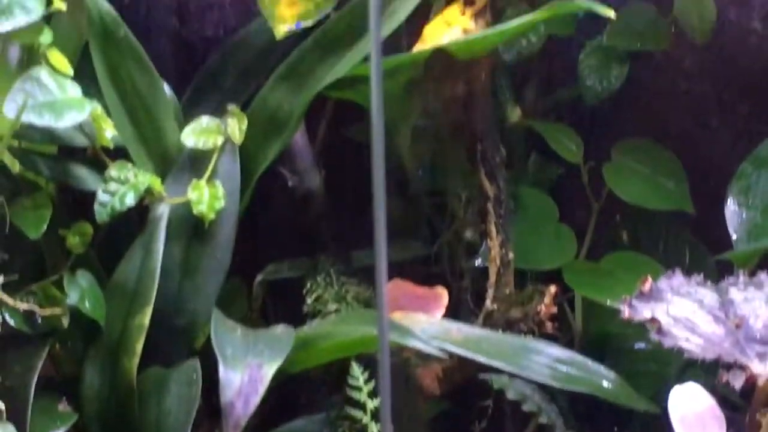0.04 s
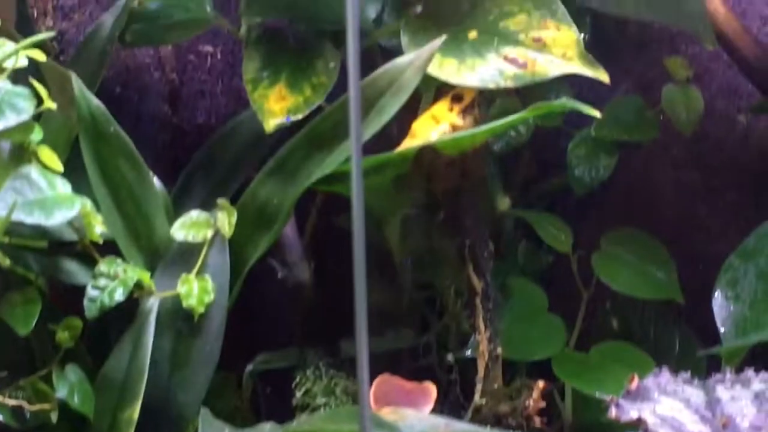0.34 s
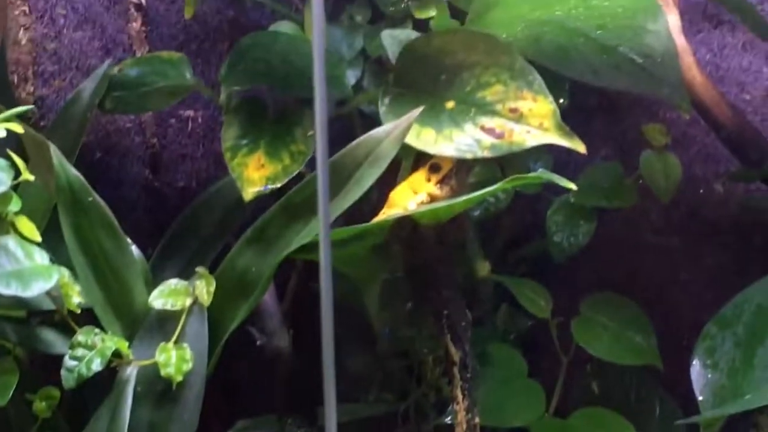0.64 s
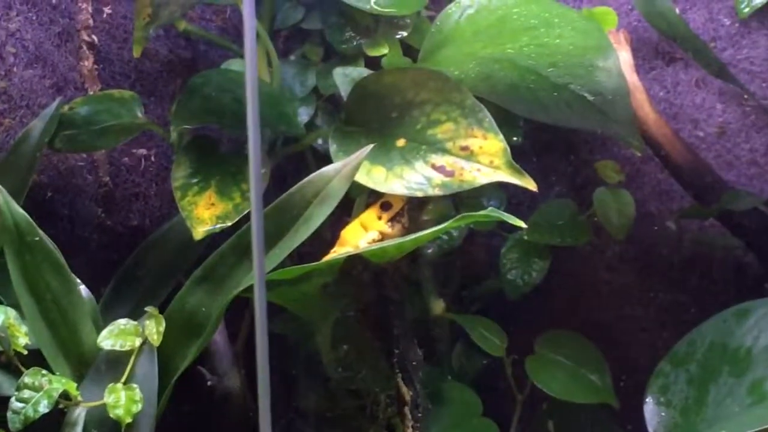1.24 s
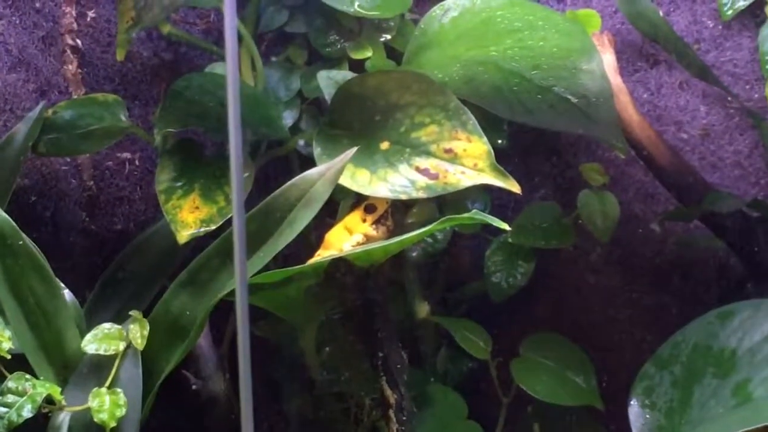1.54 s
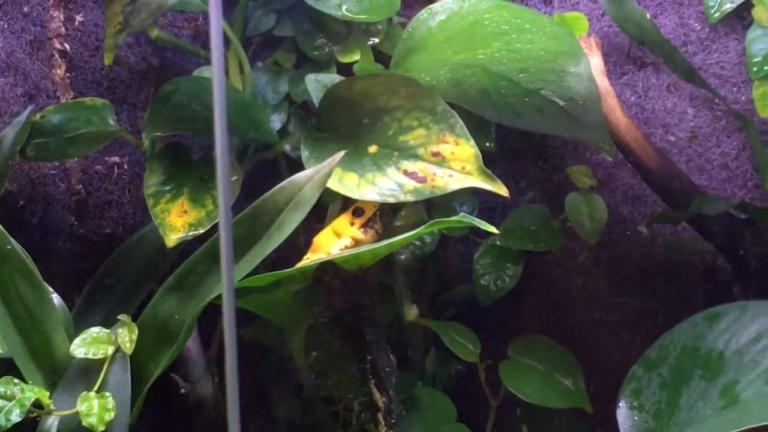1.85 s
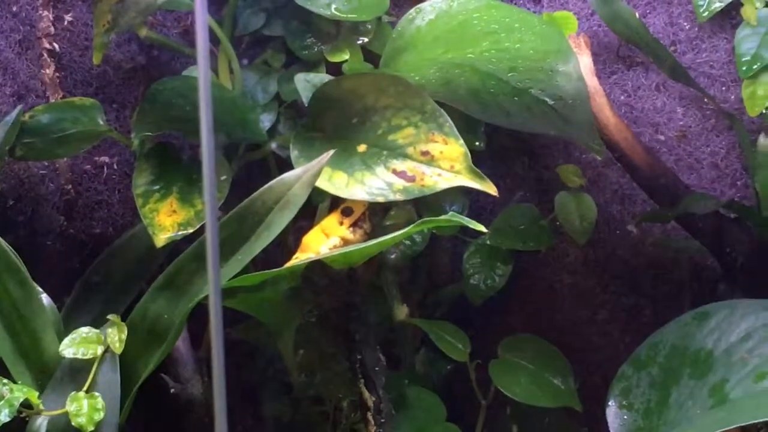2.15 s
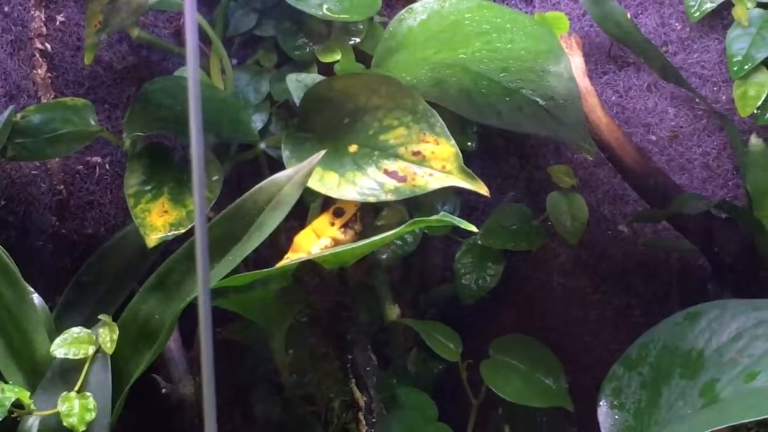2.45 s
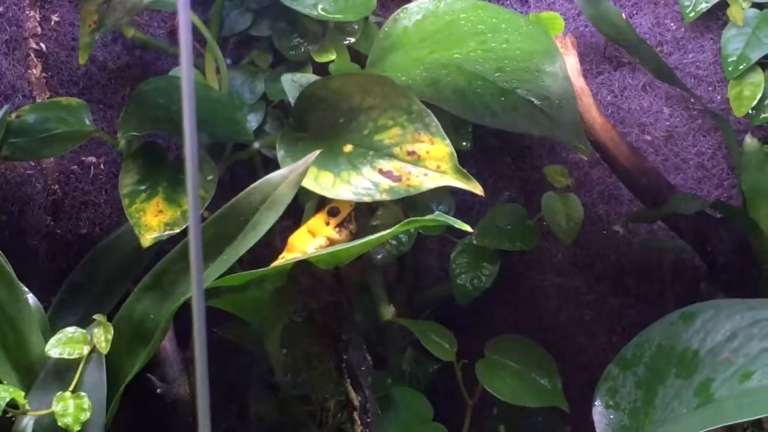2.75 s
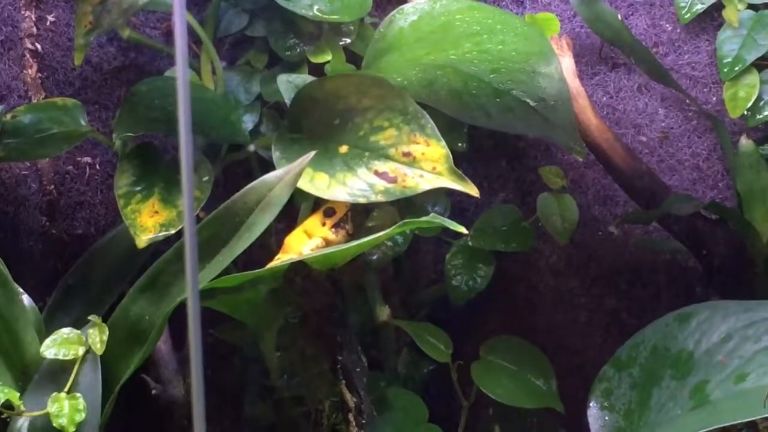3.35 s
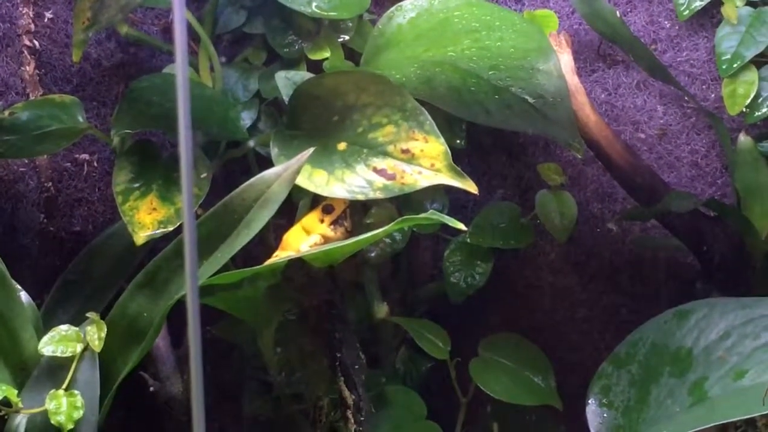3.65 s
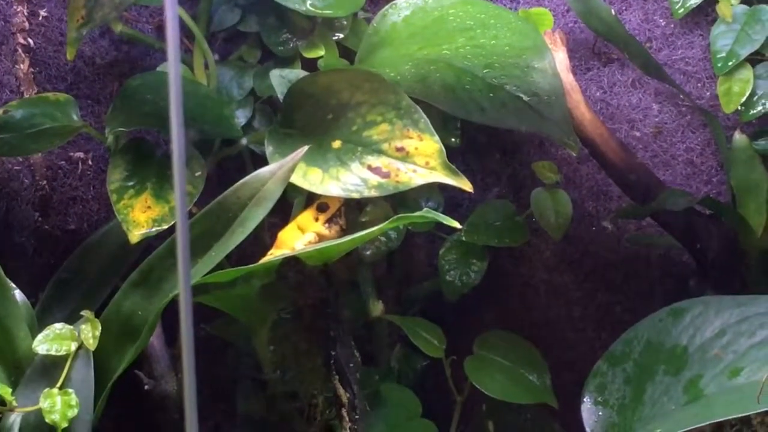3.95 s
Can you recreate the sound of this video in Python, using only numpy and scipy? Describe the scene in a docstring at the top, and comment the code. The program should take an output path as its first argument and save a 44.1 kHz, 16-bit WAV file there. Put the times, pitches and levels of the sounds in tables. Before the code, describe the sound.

Rapid, raspy, whistling trill of a small frog in a glass enclosure, faint low hum beneath.

```python
"""In a planted glass tank a small frog trills, about ten notes a second.
Each note is a pulsed rasp that rings the throat's resonances, with a whistle of the vocal sac that
swells three times over a rising lower partial; reflections from the glass walls ring on after it.
A low hum, rumble and faint hiss lie beneath, with a brief rustle, one soft knock and three ticks."""
import sys
import numpy as np
from scipy import signal
from scipy.fft import rfft, irfft, next_fast_len
from scipy.io import wavfile
from scipy.ndimage import map_coordinates

SR = 44100
rng = np.random.default_rng(int(sys.argv[2]) if len(sys.argv) > 2 else 0)


def output_pcm(signal):
    """Save a mono or channel-first signal as 16-bit PCM at the path in sys.argv[1].

    Samples are clipped to [-1, 1] before scaling.
    """
    pcm = np.clip(np.atleast_2d(signal).T, -1, 1) * 32767
    wavfile.write(sys.argv[1], SR, np.round(pcm).astype(np.int16))


N = 176400
T = np.arange(SR // 12) / SR  # time within one note or tick [s]

# Notes of the trill (onset [s], relative level of the sac's first, second, third swell [dB])
TRILL_NOTES = [(0.032, -50.5, -46.5, -44), (0.127, -45, -51, -49), (0.223, -45, -52, -45),
               (0.318, -47, -47, -48), (0.412, -46.5, -47, -41), (0.509, -47, -48, -48),
               (0.601, -46.5, -53, -43), (0.696, -46.5, -47.5, -48), (0.789, -47, -46.5, -68),
               (0.885, -44, -55, -68), (0.979, -48.5, -50, -43), (1.074, -46.5, -51, -47),
               (1.169, -46, -59, -45), (1.263, -45.5, -53, -49), (1.358, -44, -48, -41.5),
               (1.452, -44, -45, -65), (1.544, -50, -48.5, -53), (1.638, -46, -46, -54.5),
               (1.731, -46.5, -58, -64), (1.828, -45, -60, -64), (1.919, -45, -73, -75),
               (2.015, -46, -56, -52), (2.109, -46.5, -57, -53), (2.203, -46, -47.5, -51),
               (2.298, -47, -48.5, -51), (2.393, -48.5, -53, -58), (2.485, -49, -46.5, -72),
               (2.581, -50, -43.5, -72), (2.676, -44.5, -68, -57), (2.772, -44.5, -60, -66),
               (2.869, -43, -72, -48.5), (2.963, -47.5, -60, -68), (3.058, -51, -38.5, -61),
               (3.154, -46.5, -43, -71), (3.25, -45.5, -40, -51), (3.344, -45, -51, -60),
               (3.44, -49, -42.5, -54), (3.536, -44.5, -39.5, -62), (3.633, -46, -38.5, -48),
               (3.731, -44, -36, -45), (3.828, -43.5, -37.5, -52), (3.926, -41.5, -36, -54)]
# Slow drift (time [s], sac pitch [Hz], lower partial's start [Hz], its gain [dB], rasp gain [dB])
TRILL_DRIFT = [(0, 2209, 1534, -51, -1.04), (1.3, 2226, 1548, -51.5, -0.4), (2.4, 2207, 1565, -51.5, 0.5),
               (3.4, 2146, 1551, -52, 0.05), (4, 2131, 1590, -64, -0.8)]


def frog(grain_renewal=0.33, echo_renewal=0.24, whistle_echo_db=-5):
    """Superposition: whistle, partial and rasp add into a note, convolved with the tank's response."""
    out = np.zeros(N)
    grain, tail = rng.standard_normal(len(T)), tank_response()
    times, *controls = np.transpose(TRILL_DRIFT)
    usual_db = np.mean([max(row[1:]) for row in TRILL_NOTES])
    for onset, *levels in TRILL_NOTES:
        sac_hz, lower_hz, lower_db, rasp_db = [np.interp(onset, times, c) for c in controls]
        grain = blend(grain, rng.standard_normal(len(T)), grain_renewal)
        tail = blend(tail, tank_response(), echo_renewal)
        extra_db = max(levels) - usual_db
        effort = amp(rasp_db + .2 * extra_db)  # the rasp grows with the whistle
        echo_gain = amp(whistle_echo_db - .5 * extra_db)  # louder whistles are drier
        whistle = vocal_sac(sac_hz, levels)
        body = amp(lower_db) * lower_partial(lower_hz) + effort * rasp(grain)
        add(out, onset, whistle + body)
        add(out, onset, signal.fftconvolve(echo_gain * whistle + body, tail))
    return out


# Swells of the sac within a note (centre [s], half width [s], gain [dB])
SAC_SWELLS = [(.0065, .0042, 1), (0.0173, 0.0048, 2.5), (0.029, 0.0036, -1.5)]


def vocal_sac(hz, levels, scatter=0.0087, bend_hz=47.3, octave_db=-34.5):
    """Amplitude and frequency modulation: a nearly pure whistle swells three times, bending upward."""
    out = np.zeros(len(T))
    for (centre, width, gain_db), db in zip(SAC_SWELLS, levels):
        u = (T - centre) / width
        pitch = hz * (1 + scatter * rng.normal()) + bend_hz * np.tanh(u)
        phase = 2 * np.pi * (np.cumsum(pitch) / SR + rng.random())
        swell = np.exp(-u * u / 2 * np.sqrt(1 + u * u))
        out += amp(db + gain_db) * swell * (np.sin(phase) + amp(octave_db) * np.sin(2 * phase))
    return np.sqrt(2) * out


# Envelope of the lower partial (time [s], relative level [dB])
LOWER_ENVELOPE = [(0, -14), (.004, 1), (.009, 0.5), (.014, -10), (.022, -1.5), (.032, -7), (.04, -28)]


def lower_partial(hz, rise_hz_per_s=7110, roughness=0.81, flutter_rate=300):
    """Random modulation of amplitude and phase spreads a rising tone into a rough, narrow band."""
    phase = 2 * np.pi * np.cumsum(hz + rise_hz_per_s * T) / SR
    flutter = wobble(flutter_rate, len(T)) + 1j * wobble(flutter_rate, len(T))
    tone = np.imag((1 + roughness * flutter) * np.exp(1j * phase))
    return envelope(LOWER_ENVELOPE) * unit(tone)


# Envelope of the rasp (time [s], relative level [dB])
RASP_ENVELOPE = [(0, -29), (.001, 1), (.014, 2.5), (.029, 2.5), (.036, -8), (.05, -21)]
# Broad response of the throat (frequency [Hz], gain [dB])
THROAT_RESPONSE = [(500, -20), (780, -32), (1020, -20), (1220, -2.5), (1650, 5.5), (2100, 10), (2750, -4),
                   (3050, -8), (3400, -8), (4300, -9), (4950, -8), (6200, -23.5), (7000, -14),
                   (7800, -14.5), (8600, -9), (9400, -11), (10100, -23), (12000, -34)]
# Throat resonances (frequency [Hz], half width [Hz], relative level [dB], peak time [s])
THROAT_FORMANTS = [(1007, 102, -71.5, 0.025), (1770, 53, -60.5, 0.031), (2398, 196, -58.5, .025),
                   (2685, 107, -57.5, 0.031), (2852, 60, -62.5, 0.035), (3307, 144, -62.5, 0.019),
                   (3520, 116, -63, 0.022), (4004, 160, -67, 0.017), (4414, 460, -65.5, 0.02),
                   (5090, 73, -72.5, 0.011), (5374, 160, -70, 0.024), (5980, 570, -68, 0.015),
                   (9070, 226, -69.5, 0.017)]


def rasp(grain, pulse_hz=546.1, depth=0.51, jitter=0.13, broad_db=-56, swell_s=.011):
    """Source and filter: unevenly pulsed noise is coloured by the throat and rings its formants."""
    rate = pulse_hz * (1 + jitter * wobble(306, len(T)))
    pulses = grain * (1 + depth * np.cos(2 * np.pi * np.cumsum(rate) / SR))
    out = amp(broad_db) * envelope(RASP_ENVELOPE) * unit(coloured(pulses, THROAT_RESPONSE))
    attack = 1 - np.exp(-T / 0.00033)
    for hz, width, db, peak_s in THROAT_FORMANTS:
        centre = hz * (1 + 0.0067 * rng.normal())  # pitch and level scatter between notes
        gain = amp(db + 1.63 * rng.normal())
        ring = unit(filtered(pulses, lambda f: 1 / (1 + 1j * (f - centre) / width) ** 2))
        swell = np.exp(-((T - peak_s) / swell_s) ** 2 / 2) * attack
        formant = swell * ring
        out += gain * formant * np.linalg.norm(swell) / np.linalg.norm(formant)
    return out


# Reverberation time of the tank (frequency [Hz], time to fall 60 dB [s])
TANK_DECAY = [(200, 0.33), (1000, 0.27), (1900, 0.3), (3000, 0.29), (5000, 0.21), (9000, 0.19),
              (15000, 0.1)]
# Colour of the tank's echo (frequency [Hz], gain [dB])
TANK_SPECTRUM = [(200, 2), (1400, -11), (1850, -1), (2020, 7), (2200, -12), (2500, -2), (2800, -7.5),
                 (3500, -4.5), (9000, -5), (15000, 7)]


def tank_response(gain_db=-1.5, delay_s=.006):
    """Reverberation: dense reflections from the glass die away, each frequency at its own rate."""
    hz, t, spectra = signal.stft(rng.standard_normal(SR // 3), SR, nperseg=256)
    decay = amp(-60 * t / along(TANK_DECAY, hz)[:, None])
    _, tail = signal.istft(spectra * decay, SR, nperseg=256)
    tail = coloured(tail / np.linalg.norm(tail), TANK_SPECTRUM)
    return amp(gain_db) * np.pad(tail, (round(delay_s * SR), 0))


# Cluster of ticks (time [s], level [dB])
TICK_EVENTS = [(1.4616, -48.5), (1.468, -48.5), (1.4786, -46)]
# Spectrum of a tick (frequency [Hz], relative level [dB])
TICK_SPECTRUM = [(2000, -33), (5700, -6), (7000, -7), (8300, 2), (10000, -5), (13000, -5), (15500, -19)]


def ticks(t60_s=0.034, echo_gain_db=3):
    """Impulsive excitation: bright, fast-decaying bursts set off the tank's reverberation."""
    out = np.zeros(N)
    for onset, db in TICK_EVENTS:
        tick = amp(db - 60 * T / t60_s) * noise(TICK_SPECTRUM, len(T))
        add(out, onset, tick)
        add(out, onset, amp(echo_gain_db) * signal.fftconvolve(tick, tank_response()))
    return out


# Spectrum of the knock (frequency [Hz], relative level [dB])
KNOCK_SPECTRUM = [(40, -15), (90, 3), (200, 1), (450, 2.5), (650, -5), (1100, 5), (1400, -14), (3000, -32)]


def knock(onset_s=1.056, gain_db=-60.5, attack_s=0.0023, t60_s=0.25):
    """Exponential damping: one soft, dull burst of noise rises quickly and dies away."""
    t = np.maximum(np.arange(N) / SR - onset_s, 0)
    attack = 1 - np.exp(-t / attack_s)
    return amp(gain_db - 60 * t / t60_s) * attack * noise(KNOCK_SPECTRUM, N)


# Spectrum of the rustle (frequency [Hz], relative level [dB])
RUSTLE_SPECTRUM = [(4000, -25), (6000, -5), (6800, 3), (7600, -8), (10500, -10), (11700, -4), (12600, -11),
                   (15500, -12)]


def rustle(centre_s=.49, width_s=.022, peak_db=-77):
    """High noise under a Gaussian envelope has no sharp onset and is heard as a brief rustle."""
    u = (np.arange(N) / SR - centre_s) / width_s
    return amp(peak_db) * np.exp(-u * u / 2) * noise(RUSTLE_SPECTRUM, N)


# Spectrum of the rumble (frequency [Hz], relative level [dB])
RUMBLE_SPECTRUM = [(20, -29), (32, -9.5), (42, -5), (62, 0.5), (80, -5.5), (110, -8), (170, -22),
                   (400, -51)]
# Spectrum of the hiss (frequency [Hz], relative level [dB])
HISS_SPECTRUM = [(100, -6.5), (160, 1), (260, -1), (400, -4.5), (650, -10), (1100, -8), (2000, -6),
                 (4000, -16), (8000, -27.5), (12000, -29), (15500, -34.5)]


def background(hum_hz=43.9, hum_db=-70.5, rumble_db=-65, hiss_db=-68):
    """Noise floor: slow random modulation makes a hum and a rumble waver under steady hiss."""
    hum = np.sin(2 * np.pi * hum_hz * np.arange(N) / SR + 0.43 * wobble(4.16, N))
    hum = unit(hum * amp(3 * wobble(2.2, N)))
    rumble = amp(rumble_db + 1.34 * wobble(11, N)) * noise(RUMBLE_SPECTRUM, N)
    return amp(hum_db) * hum + rumble + amp(hiss_db) * noise(HISS_SPECTRUM, N)


def amp(db):
    """Decibels to amplitude ratio."""
    return 10 ** (np.asarray(db) / 20)


def unit(x):
    """Normalisation to rms 1."""
    return x / np.sqrt(np.mean(x ** 2) + 1e-20)


def along(points, hz):
    """Interpolation of (frequency [Hz], value) points on a log axis."""
    f, v = np.transpose(points)
    return np.interp(np.log(hz + 1), np.log(f + 1), v)


def filtered(x, response):
    """Linear filtering: the spectrum times a frequency response."""
    m = next_fast_len(len(x) + 8192)
    return irfft(rfft(x, m) * response(np.fft.rfftfreq(m, 1 / SR)), m)[:len(x)]


def coloured(x, spectrum):
    """Spectral shaping by (frequency [Hz], gain [dB]) points."""
    return filtered(x, lambda hz: amp(along(spectrum, hz)))


def noise(spectrum, size):
    """Coloured noise of rms 1."""
    return unit(coloured(rng.standard_normal(size), spectrum))


def wobble(rate, size):
    """A smooth random curve, rate knots a second."""
    knots = rng.standard_normal(int(size * rate / SR) + 4)
    return map_coordinates(knots, [np.arange(size) * rate / SR])


def blend(old, new, share):
    """Equal-power mix of two uncorrelated signals."""
    return np.sqrt(1 - share) * old + np.sqrt(share) * new


def envelope(points):
    """Envelope through (time [s], level [dB]) points, silent after the last."""
    return amp(np.interp(T, *np.transpose(points), right=-np.inf))


def add(track, onset_s, sound):
    """Superpose a sound on the track."""
    part = track[round(onset_s * SR):][:len(sound)]
    part += sound[:len(part)]


def scene():
    """Superposition: the pressures of all sources add at one microphone."""
    return (frog() + ticks() + knock() + rustle() + background())[None]


def record(dry):
    """Band limiting: an ideal low-pass filter removes the highest treble."""
    return np.array([filtered(channel, lambda hz: hz < 15700) for channel in dry])


dry = scene()
out = record(dry)
output_pcm(out)
```